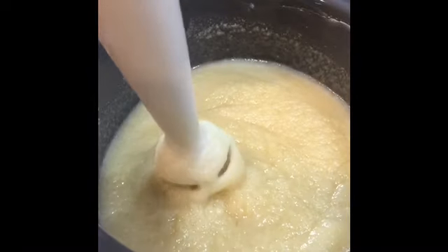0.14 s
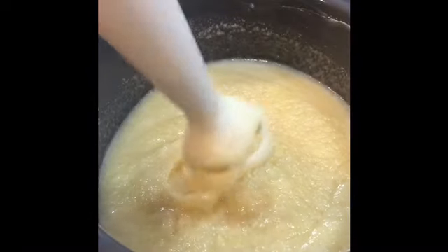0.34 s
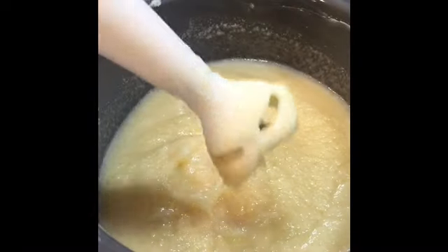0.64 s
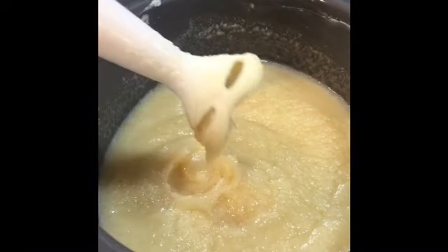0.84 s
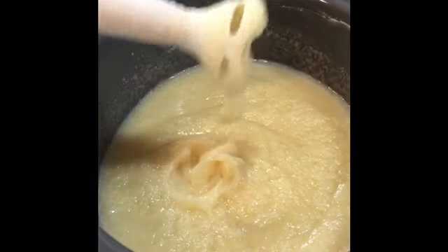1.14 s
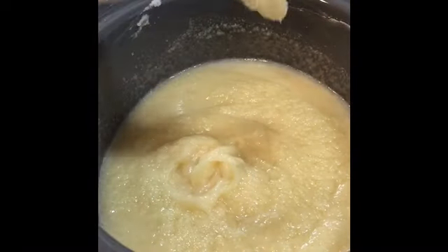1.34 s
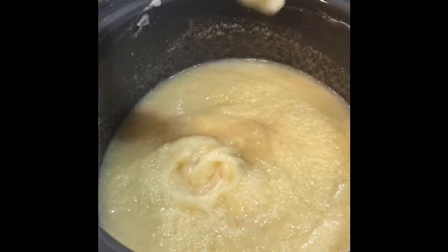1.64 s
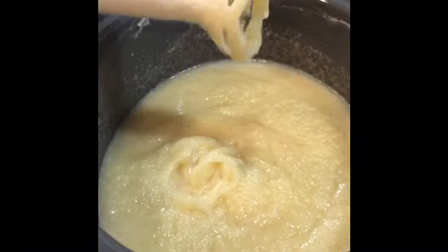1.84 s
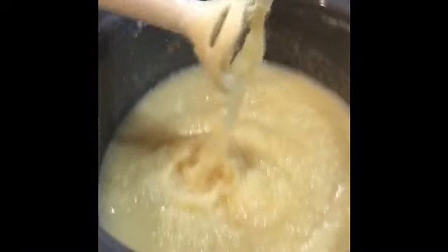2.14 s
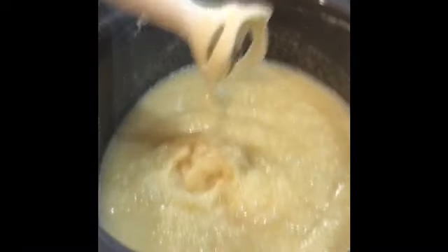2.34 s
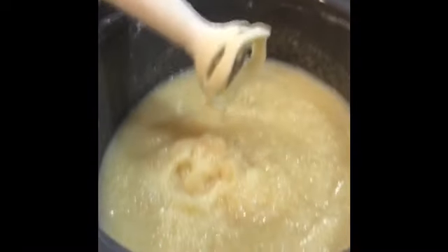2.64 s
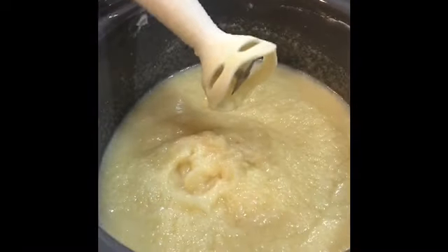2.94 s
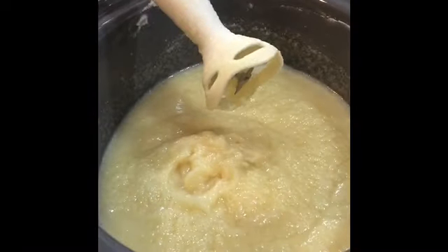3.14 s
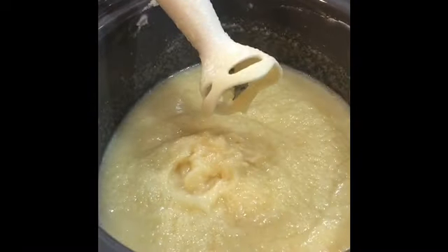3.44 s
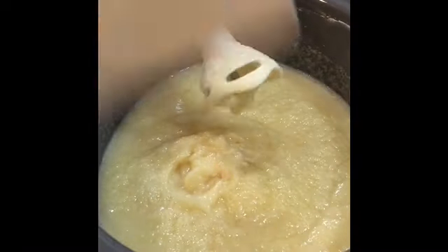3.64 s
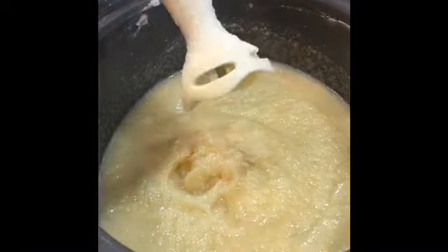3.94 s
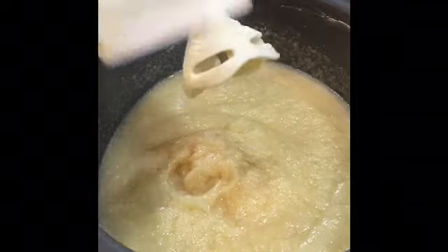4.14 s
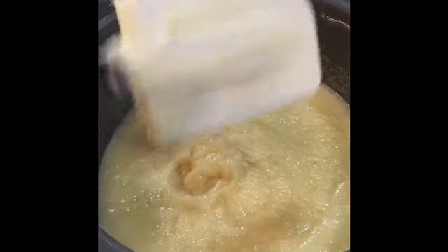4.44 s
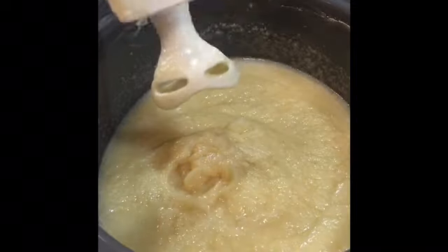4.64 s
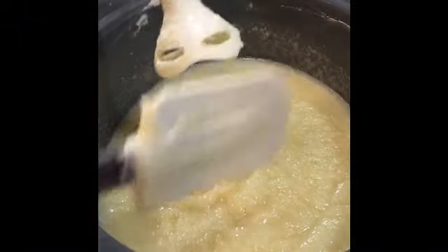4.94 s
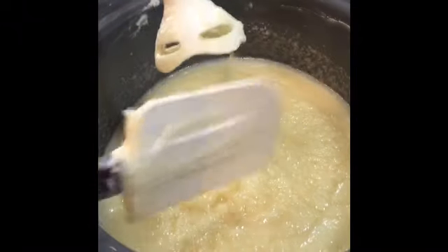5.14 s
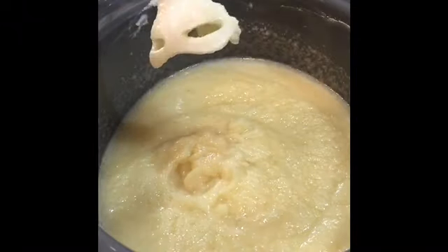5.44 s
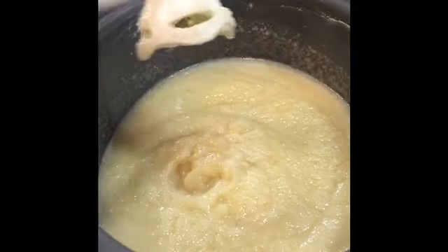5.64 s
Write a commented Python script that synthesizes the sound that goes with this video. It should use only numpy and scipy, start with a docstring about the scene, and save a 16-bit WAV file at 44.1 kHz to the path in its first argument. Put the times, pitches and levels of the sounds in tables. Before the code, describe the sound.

Close to a pot of batter, a blender motor winds down while its housing clicks. Hard hollow knocks shake it clean, each with a brief room echo and a low swaying thump; the microphone's support clatters and overloads. Then low room rumble, tiny taps on the handle, and a final dull spatula blow with deep thud.

```python
"""A stick blender's hum and rasp slow to a stop in a pot of batter, while a small kitchen rumbles softly.
Knocks shake the batter off the blender, the last with a spatula: noise bursts that fade like its housing.
Hard knocks also thud through to the support of a nearby camera, which sways and rattles: fading sine waves.
Batter ticks softly, light taps ring the handle, and the kitchen echoes the knocks.
The camera's microphone overloads at the loudest moments."""
import sys
import numpy as np
from scipy import signal
from scipy.fft import rfft, irfft, next_fast_len
from scipy.io import wavfile

SR = 44100
rng = np.random.default_rng(int(sys.argv[2]) if len(sys.argv) > 2 else 0)


def int16_out(signal):
    """Quantize to a 16-bit WAV file."""
    q = np.round(np.clip(np.atleast_2d(signal).T, -1, 1) * 32767)
    wavfile.write(sys.argv[1], SR, q.astype(np.int16))


N = 255339  # length of the scene in samples

# The plastic housing of the blender, rung by knocks and taps.
# Each row: resonance in Hz, width in Hz, relative level in dB.
HOUSING = [(770, 780, -6.5), (1050, 780, -2), (1357, 180, 8), (1620, 390, -1.5), (1790, 160, -4),
           (2450, 700, -20.5), (3782, 670, -18)]
# Blows that reach the camera's support.
# Each row: start in seconds, level in dB, pitch of the thump as a ratio.
BLOWS = [(0.764, -35.5, 0.88), (0.916, -31.5, 0.99), (1.110, -12, 1.05), (1.919, -10, 1.042),
         (2.147, -6, 0.97), (2.366, -10.5, .93), (2.656, -7.5, 0.97), (5.123, -9.5, 0.77)]

START_HZ = 133.7  # turns per second of the blender's shaft at the start


def amp(db):
    """Turn decibels into a gain."""
    return 10 ** (np.asarray(db) / 20)


def unit(x):
    """Scale a sound to an rms (average strength) of 1."""
    return x / np.sqrt(np.mean(x ** 2) + 1e-20)


def along(points, hz):
    """Read a curve of (Hz, value) points, with frequency on a log axis."""
    point_hz, values = np.transpose(points)
    return np.interp(np.log(hz + 1), np.log(point_hz), values)


def filtered(x, response):
    """Multiply each frequency of a sound by the gain that response gives for it."""
    size = next_fast_len(len(x) + SR // 4)  # spare room keeps the end from wrapping to the start
    spectrum = rfft(x, size) * response(np.fft.rfftfreq(size, 1 / SR))
    return irfft(spectrum, size)[:len(x)]


def noise(colour, size):
    """Make noise of rms 1 whose spectrum follows (Hz, dB) points."""
    return unit(filtered(rng.standard_normal(size), lambda hz: amp(along(colour, hz))))


def resonance(f, hz, width):
    """Gain of one resonance at frequency f: 1 at its centre, less on both sides."""
    return np.abs(f * width / (hz * hz - f * f + 1j * f * width))


def resonant_noise(peaks, size):
    """Make noise of rms 1 through (Hz, width, dB) resonances, squared to make them steeper."""
    def body(f):
        powers = [(amp(db) * resonance(f, hz, width) ** 2) ** 2 for hz, width, db in peaks]
        return np.sqrt(sum(powers))
    return unit(filtered(rng.standard_normal(size), body))


def fade(t, t60):
    """Exponential decay that has lost 60 dB after t60 seconds."""
    return amp(-60 * t / t60)


def ring(modes, t, pitch=1):
    """Sum fading sines; neighbours start in opposite directions, so close pairs swell and beat."""
    total = 0
    for k, (hz, db, t60) in enumerate(modes):
        sine = np.sin(2 * np.pi * hz * pitch * t)
        total = total + (-1) ** k * amp(db) * fade(t, t60) * sine
    return total


def add(track, s, sound):
    """Mix a sound into the track, starting at s seconds."""
    part = track[round(s * SR):][:len(sound)]
    part += sound[:len(part)]


def shaft_speed(drag_s=0.48, friction_hz_per_s=34):
    """Turns per second: the batter's drag (a time constant) and dry friction brake the shaft to a stop."""
    t = np.arange(N) / SR
    offset = friction_hz_per_s * drag_s
    speed = (START_HZ + offset) * np.exp(-t / drag_s) - offset
    return np.maximum(speed, 1e-3)  # just above zero, so that it can be divided by


def motor(pot_hz=260, pot_width_hz=75, overtone_db=-13, pulsing=0.08, tick_hz=50, uneven_db=1.6):
    """The unbalanced shaft hums as it slows; the gear rasp breaks up into single ticks."""
    # Colour of the gear rasp. Each row: frequency in Hz, relative level in dB per Hz.
    gear_colour = [(200, -22), (330, -9.5), (430, -11.5), (650, -2.5), (1000, -8), (1400, 2.5), (2100, -10),
                   (3000, -24.5), (4100, -16.5), (5300, -49), (7500, -49), (9300, -38), (11500, -64)]
    # Resonances that the slowing shaft shakes in turn. Each row: centre in Hz, width in Hz, level in dB.
    shaken = [(113.5, 37, -20), (76, 11.2, -25.5), (39.5, 11, -37.5)]
    start_db, db_per_octave = -34, 15.5  # rasp at the first speed, and its loss each time the speed halves
    sharpest = 12  # limits how narrow a gear tick gets at a crawl
    hz = shaft_speed()
    turns = np.cumsum(hz) / SR
    angle = 2 * np.pi * turns

    shake = sum(amp(db) * resonance(hz, centre, width) ** 2 for centre, width, db in shaken)
    # even overtones flare up as they glide through the pot's resonance
    overtones = sum(resonance(k * hz, pot_hz, pot_width_hz) ** 2 * np.cos(k * angle) for k in (2, 4))
    hum = np.sqrt(2) * (np.cos(angle) + amp(overtone_db) * overtones)

    # one rasp a turn, each of its own strength, sharper at low speed
    strength = amp(uneven_db * np.interp(turns, np.arange(N), rng.standard_normal(N)))
    sharpness = pulsing + np.minimum((tick_hz / hz) ** 2, sharpest)
    gate = np.exp(sharpness * np.cos(angle)) / np.sqrt(np.i0(2 * sharpness))  # keeps the average power
    gear_db = start_db + db_per_octave * np.log2(hz / START_HZ)
    rasp = amp(gear_db) * noise(gear_colour, N) * gate * strength
    return shake * hum + rasp


def background(db=-44.5, width_hz=14):
    """Low rumble and hiss are coloured noise; narrow bands of noise make wavering drones."""
    # Colour of the rumble and hiss. Each row: frequency in Hz, relative level in dB per Hz.
    rumble_colour = [(13, -34), (22, -9.5), (49, 3), (66, -8.5), (114, -6.5), (146, -17.5), (203, -14.5),
                     (324, -30), (393, -27), (450, -40), (577, -31), (1110, -38.5), (1240, -37.5),
                     (2540, -47), (15500, -60)]
    # Narrow drones of the kitchen. Each row: frequency in Hz, level in dB.
    drone_rows = [(39, -46.5), (116, -54.5), (202, -61)]
    drones = sum(amp(level) * resonant_noise([(hz, width_hz, 0)], N) for hz, level in drone_rows)
    return amp(db) * noise(rumble_colour, N) + drones


def drips(t60=0.014):
    """Films of batter break with tiny ticks, each a short burst of bright noise."""
    # Wet ticks of batter. Each row: start in seconds, level in dB.
    tick_rows = [(0.157, -53.5), (0.209, -54), (1.335, -62), (1.488, -56), (1.506, -54.5)]
    # Colour of a tick. Each row: frequency in Hz, relative level in dB per Hz.
    tick_colour = [(2500, -28), (4000, -0.5), (5800, -5), (7100, -24), (9300, 7.5), (11500, -16),
                   (15000, -16.5)]
    out, t = np.zeros(N), np.arange(SR // 20) / SR
    for s, db in tick_rows:
        add(out, s, amp(db) * noise(tick_colour, len(t)) * fade(t, t60))
    return out


def knocks(crack_t60=0.016, snap_t60=0.0082, rise=0.00019, accent_db=4, accent_width_hz=600,
           hollow_sustain=1.4):
    """A short contact, brighter when hard, then the housing's ring; each knock favours one resonance."""
    # Knocks on the blender. Each row: start in seconds, level in dB, hardness from 0 to 1,
    # hollow sound against the shell in dB, favoured shell resonance in Hz, shell decay (t60) in seconds.
    knock_rows = [(.238, -31.5, 0.3, -6, 1500, 0.049), (0.2495, -20.5, 0, -15, 3900, .014),
                  (0.2541, -15, 0, -28, 2200, 0.017), (.747, -25, 0.6, -12.5, 1220, 0.038),
                  (1.103, -29.5, 0.68, 1.5, 1520, 0.025), (1.561, -42, 0.54, -5, 1450, 0.085),
                  (1.900, -32, 0.6, -6, 1110, 0.1), (1.916, -34, 0.8, -1, 1790, .12),
                  (2.1418, -11.5, .72, -0.5, 1900, 0.032), (2.3606, -22.5, 0.8, -2, 1100, 0.069),
                  (2.652, -16, 0.69, -3, 1400, 0.054), (3.207, -59.5, .3, 0, 1300, .1),
                  (5.112, -26, 0, 1.5, 1390, 0.028)]
    # Colours of the hollow inside, the contact's crack and the snap of its hard edge.
    # Each row: frequency in Hz, relative level in dB per Hz.
    hollow_colour = [(120, -20.5), (220, 3), (320, 4.5), (440, -4), (620, -3), (850, -5.5), (1300, -14),
                     (1800, -46.5)]
    crack_colour = [(1500, -22.5), (2600, -4), (3900, 4), (4800, -3.5), (6000, -2), (7100, -21.5),
                    (9000, -27.5)]
    snap_colour = [(4000, -25.5), (6000, -3.5), (7100, -17.5), (8300, 7.5), (9500, -6.5), (10500, -9),
                   (12500, -13), (15500, -22)]
    # level against the shell for the hardest contact, and the change for the softest, in dB
    crack_db, crack_soft_db = -6.5, -16
    snap_db, snap_soft_db = 2, -58
    press_s = 0.009  # a 0 dB knock presses this long before the housing rings; lighter ones less
    out, t = np.zeros(N), np.arange(SR // 4) / SR
    for s, db, hardness, hollow_db, accent_hz, t60 in knock_rows:
        softness = 1 - np.clip(hardness, 0, 1)
        peaks = HOUSING + [(accent_hz, accent_width_hz, accent_db)]
        shell = resonant_noise(peaks, len(t)) * fade(t, t60)
        hollow = amp(hollow_db) * noise(hollow_colour, len(t)) * fade(t, hollow_sustain * t60)
        crack = amp(crack_db + crack_soft_db * softness) * noise(crack_colour, len(t)) * fade(t, crack_t60)
        snap = amp(snap_db + snap_soft_db * softness) * noise(snap_colour, len(t)) * fade(t, snap_t60)
        add(out, s, amp(db) * (crack + snap))
        add(out, s + press_s * amp(db), amp(db) * (shell + hollow) * (1 - np.exp(-t / rise)))
    return out


def kitchen(x, build=0.002):
    """The room's echo builds up quickly and dies faster in the treble: x convolved with fading noise."""
    # How long the room rings. Each row: frequency in Hz, decay (t60) in seconds.
    decay_rows = [(150, 0.4), (700, 0.3), (1400, 0.32), (2400, 0.23), (7000, 0.17), (14000, 0.17)]
    hz, t, cells = signal.stft(rng.standard_normal(SR // 2), SR, nperseg=256)
    t60 = along(decay_rows, hz)[:, None]
    cells = cells * fade(t, t60) * (1 - np.exp(-t / build))
    tail = signal.istft(cells, SR, nperseg=256)[1]
    return signal.fftconvolve(x, tail / np.linalg.norm(tail))[:N]


def thuds(rise=0.002):
    """The blows arrive through the support as a soft thump and a slow, beating sway."""
    # Slow modes of the support. Each row: frequency in Hz, relative level in dB, decay (t60) in seconds.
    sway_modes = [(33.01, -1, .6), (37.46, 1, 0.75), (65.64, -7.5, 0.71)]
    # Its stiffer modes. Each row: frequency in Hz before the pitch ratio, relative level in dB,
    # decay (t60) in seconds.
    thump_modes = [(89.9, -6, 0.37), (117.64, 2, 0.23), (162.5, -9.5, .09), (261, -23, 0.24)]
    thump_db, thump_grows = 5, 1.38  # thump of a 0 dB blow, and its dB per dB of blow: faster than the sway
    out, t = np.zeros(N), np.arange(SR) / SR
    for s, db, pitch in BLOWS:
        sway = amp(db) * ring(sway_modes, t)
        thump = amp(thump_db + thump_grows * db) * ring(thump_modes, t, pitch)
        add(out, s, (sway + thump) * (1 - np.exp(-(t / rise) ** 2)))
    return out


def dips(depth_db=15, fall=0.07, recovery=0.5, deepest_db=8):
    """A gain that sinks after each blow, deeper for heavy ones, and swells back."""
    t = np.arange(N) / SR
    dip = 0
    for s, db, _ in BLOWS:
        age = np.maximum(t - s, 0)
        dip = dip + amp(db) * (1 - np.exp(-age / fall)) * np.exp(-(age / recovery) ** 4)
    return amp(-np.minimum(depth_db * dip, deepest_db))


def taps(scuff_db=-14, scuff_t60=0.027):
    """Light touches ring the handle as fading sines, with a little noisy scuff."""
    # Light handling taps. Each row: start in seconds, level in dB.
    tap_rows = [(1.282, -47), (4.113, -54), (4.225, -54.5), (4.38, -52), (4.736, -45.5), (4.759, -43),
                (4.796, -37.5)]
    # Modes of the handle. Each row: average frequency in Hz, relative level in dB, decay (t60) in seconds.
    handle_modes = [(315, -3, 0.022), (520, -6.5, 0.061), (784, -10, 0.013), (1482, -3, 0.047),
                    (1613, -9, 0.039), (1830, -14.5, 0.048), (2580, -25.5, .05)]
    out, t = np.zeros(N), np.arange(SR // 4) / SR
    for s, db in tap_rows:
        scuff = amp(scuff_db) * resonant_noise(HOUSING, len(t)) * fade(t, scuff_t60)
        pitch = 1 + rng.normal(0, 0.01)  # no two taps ring quite alike
        add(out, s, amp(db) * (ring(handle_modes, t, pitch) + scuff))
    return out


def clack(db, hz, t60, rise=0.00091, stiffening=1.4, contact=0.00044, push_db=-11, push_hz=205,
          case_db=-12, case_hz=1400, grit_db=-22, softening=0.82, choke=1.693):
    """Camera hits support: a few cycles, higher while pressed, with a low push, a case ring and grit."""
    # Colour of the camera's gritty contact. Each row: frequency in Hz, relative level in dB per Hz.
    grit_colour = [(500, -10), (1100, -1), (1550, 1.5), (2200, -16.5), (3000, -4.5), (4000, -20),
                   (6000, -38.5), (14000, -61)]
    t = np.arange(SR // 20) / SR
    firmness = min(amp(db), 1)  # weak bounces start more softly and stay dull
    swell = 1 - np.exp(-(t * firmness ** softening / rise) ** 2)
    # with choke over 1, the ring dies ever faster as the camera lifts off again
    swell = swell * fade((t / t60) ** choke, 0.98)
    swell = swell / swell.max()
    pressed_hz = hz * (1 + firmness * stiffening * np.exp(-t / contact))
    phase = 2 * np.pi * np.cumsum(pressed_hz) / SR
    push = amp(push_db) * np.sin(2 * np.pi * push_hz * t)
    case = amp(case_db) * np.sin(2 * np.pi * case_hz * t)
    bright = case + amp(grit_db) * noise(grit_colour, len(t))
    return amp(db) * swell * (np.sin(phase) - push + bright * (firmness * swell) ** 2)


def clacks(lead_s=0.0058, touch_hz=420, touch_t60=0.0058, land_hz=601.5, hz_per_db=9, land_t60=0.012):
    """Every bounce is one edge's short, low touch and then the full landing; firmer ones ring higher."""
    # The camera bouncing on its support. Each row: landing in seconds, level in dB,
    # level of the first touch against the landing in dB.
    bounce_rows = [(2.1946, 8.5, -1.5), (2.2228, -10.5, -25), (2.4131, 4.5, -2.5), (2.4462, 0.5, -11),
                   (2.7373, 2.5, -3.5)]
    out = np.zeros(N)
    for s, db, touch_db in bounce_rows:
        add(out, s - lead_s, clack(db + touch_db, touch_hz, touch_t60))
        add(out, s, clack(db, land_hz + hz_per_db * db, land_t60))
    return out


def scene(room_db=-5, clack_room_db=-38):
    """Airborne knocks and taps fill the kitchen; clacks stay almost dry; the ambience dips after blows."""
    air = knocks() + taps()
    rattle = clacks()
    echo = kitchen(amp(room_db) * air + amp(clack_room_db) * rattle)
    ambience = (echo + background()) * dips()
    return (motor() + air + drips() + thuds() + rattle + ambience)[None]


def record(dry, hardness=12, top_hz=15900):
    """The microphone overloads at full scale and lets almost nothing through above its top frequency."""
    clipped = dry[0] / (1 + np.abs(dry[0]) ** hardness) ** (1 / hardness)
    return filtered(clipped, lambda hz: 1 / (1 + (hz / top_hz) ** 80))[None]


dry = scene()
out = record(dry)
int16_out(out)
```